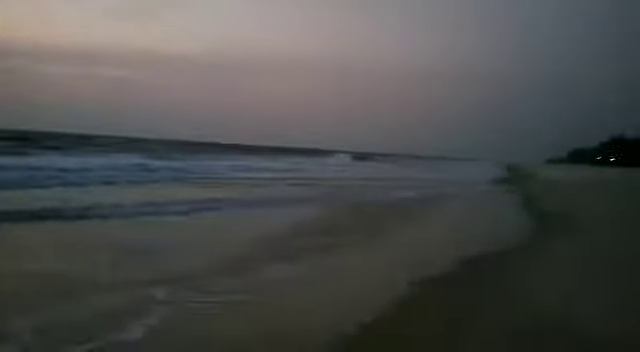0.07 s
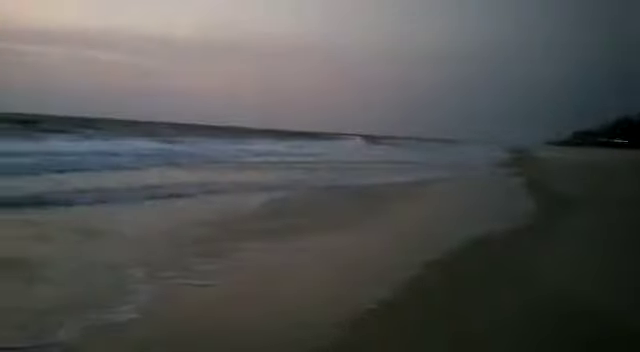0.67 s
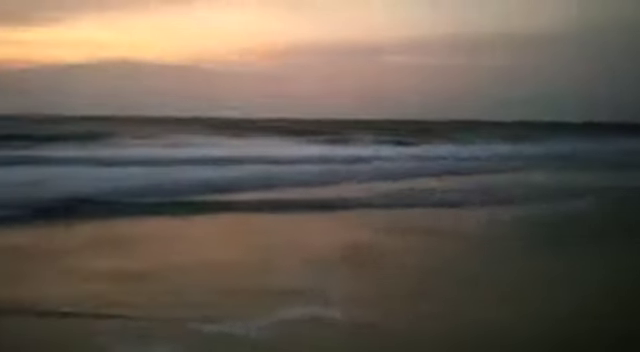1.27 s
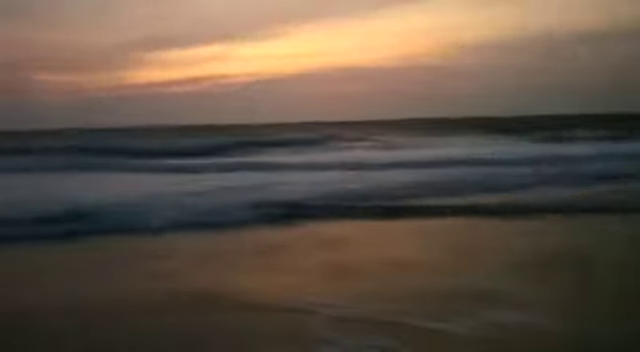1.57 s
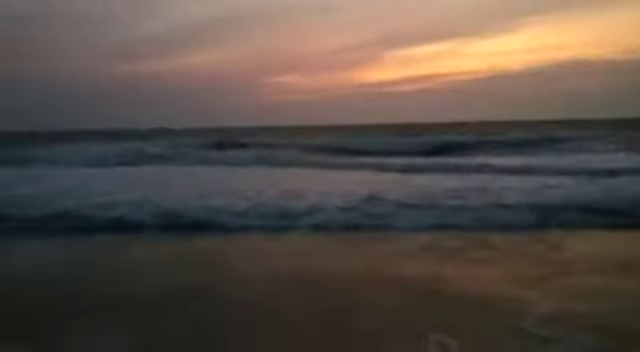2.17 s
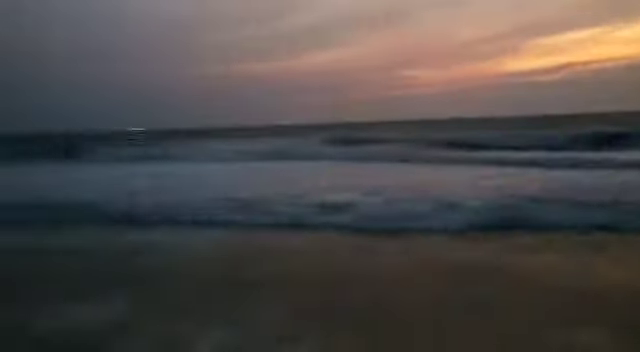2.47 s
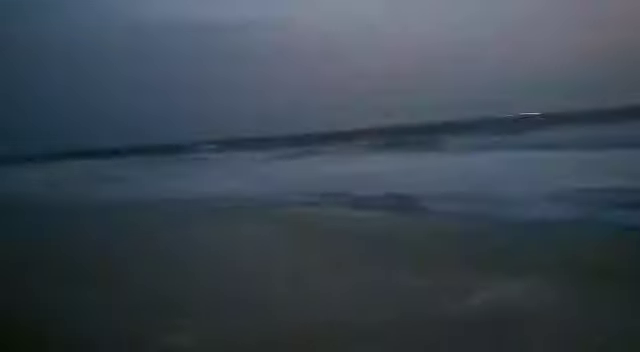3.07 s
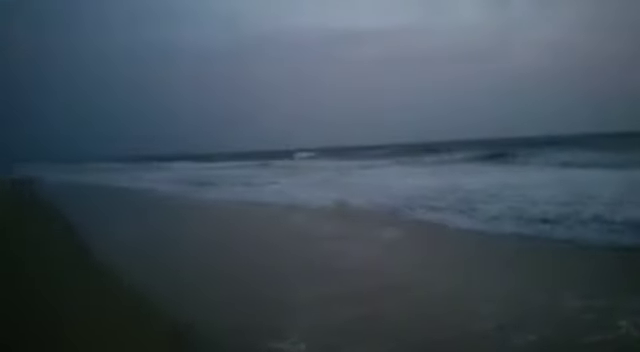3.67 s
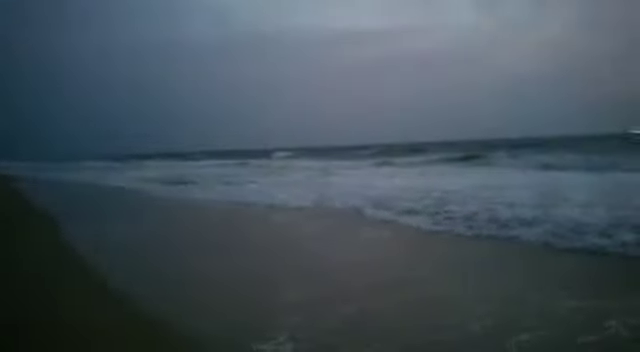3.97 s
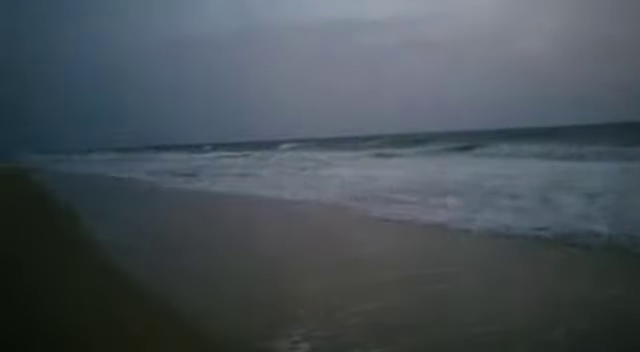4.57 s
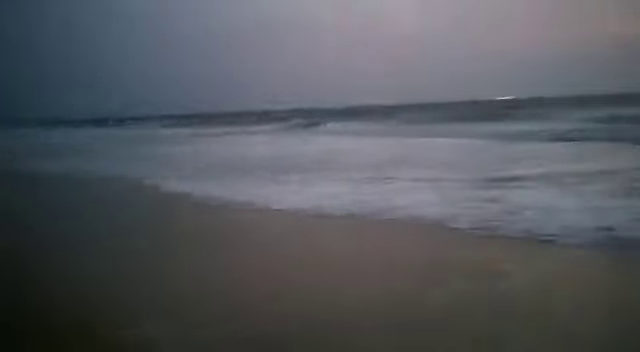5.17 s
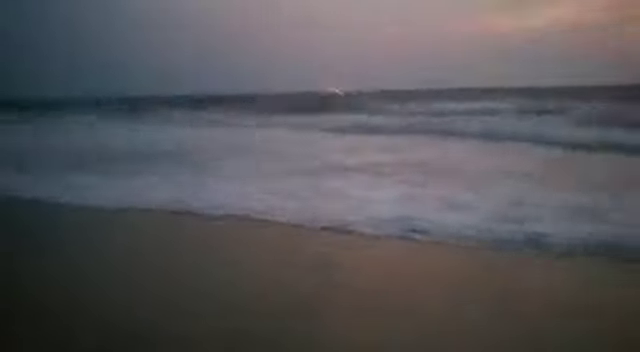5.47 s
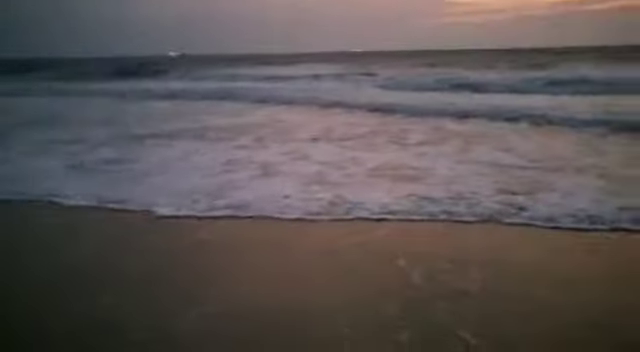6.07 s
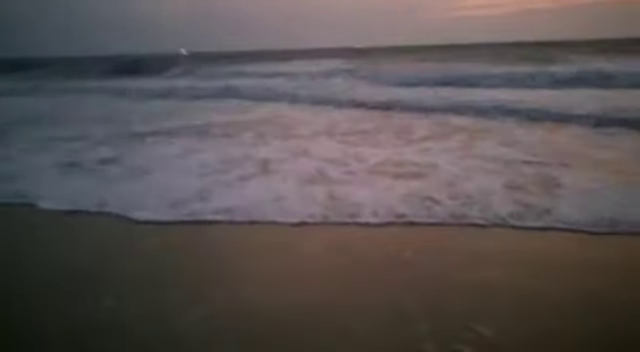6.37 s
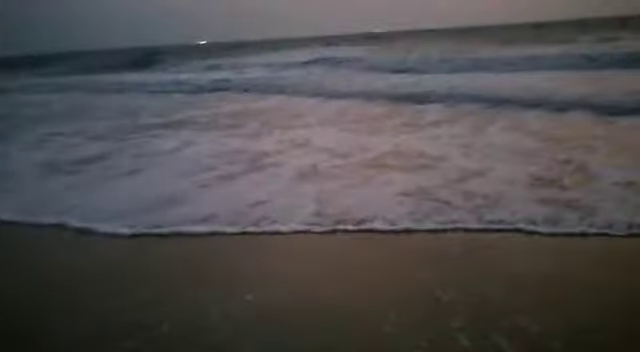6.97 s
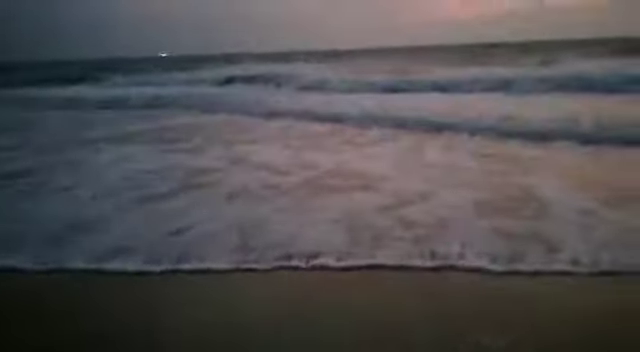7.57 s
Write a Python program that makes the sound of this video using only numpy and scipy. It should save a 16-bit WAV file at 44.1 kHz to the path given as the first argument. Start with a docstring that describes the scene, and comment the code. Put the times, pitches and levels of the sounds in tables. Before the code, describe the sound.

Foaming waves hiss on a beach while wind buffets the microphone with a rushing roar, low rumble and sputters.

```python
"""Sea wind blows across a hand-held camera while surf washes up a sandy beach behind it.
Swirling air at the two microphone openings makes a rushing roar and overloads them into a low rumble.
The roar is long and hissy on the exposed right side and comes in ragged puffs on the sheltered left.
Underneath, countless bursting foam bubbles merge into a steady, finely crackling hiss,
whose tone shifts as the camera turns from the shoreline to the sea."""
import sys
import numpy as np
from scipy import signal
from scipy.fft import rfft, irfft, next_fast_len
from scipy.io import wavfile
from scipy.ndimage import uniform_filter1d

SR = 44100
rng = np.random.default_rng(int(sys.argv[2]) if len(sys.argv) > 2 else 0)


def store_wav(level_fs):
    """Save 16-bit WAV to argv[1]."""
    pcm = np.round(np.clip(np.atleast_2d(level_fs), -1, 1) * 32767)
    wavfile.write(sys.argv[1], SR, pcm.T.astype(np.int16))


N = 344421
TIME = np.arange(N) / SR


# How hard the air blows on the right, before lulls: (time [s], strength [dB])
RIGHT_FLOW = [(0.0, -19), (0.45, -20), (0.85, -16.5), (1.22, -17), (1.29, -12), (1.6, -11.5), (1.69, -9.5),
              (1.78, -8.5), (2.15, -9.3), (2.8, -7), (3.42, -7.5), (3.62, -13), (3.8, -22.5), (4.2, -24.5),
              (4.48, -27.5), (4.72, -17), (4.9, -15.5), (4.95, -11.5), (5.09, -10), (5.16, -5.5),
              (5.45, -7), (5.58, -5.5), (5.8, -8), (6.1, -6), (7.26, -5.5), (7.31, -2), (7.58, -4),
              (7.81, -4.5)]
# Right rumble, before lulls; more tilt means more treble: (time [s], level [dB], tilt [dB/octave])
RIGHT_RUMBLE = [(0.0, -12.5, 5.5), (1.3, -13.5, 8), (1.85, -17.5, 0.5), (2.2, -21.5, 7), (2.7, -17.5, 6),
                (3.15, -16, 7), (3.5, -16.5, 1), (3.9, -17, 0.5), (4.7, -19.5, -1), (5.8, -17, 7),
                (6.8, -17.5, 1.5), (7.26, -15, 11), (7.38, -17, 9.5), (7.81, -16, 2)]
def right_wind():
    """Air blows over the exposed opening: it roars, hisses, rings and rumbles."""
    lull_db, flutter = lulls(), wander(17.4)
    flow_db = follow(RIGHT_FLOW) - lull_db
    rush = roar(flow_db, flutter) + rim_hiss(flow_db, flutter) + hollow_rings()
    return rush + rumble(follow(RIGHT_RUMBLE) - 0.22 * lull_db, follow(RIGHT_RUMBLE, column=2))


# Tone of rushing air: (frequency [Hz], relative level [dB])
RUSH_TONE = [(60, -38), (150, -5), (260, -2.5), (400, -4), (550, -0.5), (1000, -0.5), (1500, -4.5),
             (2200, -13), (3200, -26), (4500, -37), (8000, -66)]
def roar(flow_db, flutter):
    """Churning air flutters when it is weak; when strong, it brightens and its loudness levels off."""
    level_db = level_off(flow_db, ceiling_db=-8)
    weakness_db = np.clip(-8 - level_db, 0, 14)
    unsteady_db = (0.47 + 0.074 * weakness_db) * flutter + 0.18 * weakness_db * wander(86)
    tilt = 0.083 * (np.maximum(level_db, -16) + 12.5) + 0.34 * (np.maximum(flow_db, -15) + 10)
    air = swirls(RUSH_TONE, tilt, pivot_hz=860, octaves=1.8)
    return air * gain_of(level_db + unsteady_db - 0.93)


# Brief drops in the wind on the right: (deepest time [s], depth [dB], sinking time [s])
WIND_LULLS = [(0.345, 25, 0.13), (0.93, 7, 0.028), (1.195, 10.5, 0.039), (1.48, 7, 0.054),
              (1.55, 1.5, 0.045), (1.8, 3, 0.028), (2.27, 5, 0.034), (3.54, 4.5, 0.042), (3.79, 7, 0.076),
              (3.92, 1, 0.038), (4.44, -1, 0.03), (4.58, 5.5, 0.069), (4.85, 19, 0.08), (7.13, 4.5, 0.043)]
def lulls(return_s=0.027):
    """The air flow sinks, then quickly picks up again; gives the loss in dB."""
    return sum(depth * np.exp(-((TIME - at) / np.where(TIME < at, sinking, return_s)) ** 2)
               for at, depth, sinking in WIND_LULLS)


# Tone of the hiss at the opening's rim: (frequency [Hz], relative level [dB])
RIM_TONE = [(600, -28), (1500, 2.5), (2300, 5), (3200, -0.5), (4300, -4.5), (5500, -11), (6800, -26.5),
            (9000, -48), (15000, -45)]
# Moments when that hiss spurts or thins: (time [s], change [dB], half length [s])
HISS_FLICKERS = [(1.683, 4.5, 0.022), (3.154, 5.5, 0.035), (4.74, 10, 0.029), (5.183, 3, 0.04),
                 (5.503, 2.5, 0.03), (5.81, -9, 0.037), (5.98, 3, 0.15), (6.236, -5, 0.05),
                 (6.485, -17, 0.022), (6.55, 2.5, 0.025), (6.947, -3.5, 0.2), (7.293, -1, 0.018),
                 (7.315, 2, 0.014), (7.45, 0.5, 0.1), (7.71, -10, 0.037)]
def rim_hiss(flow_db, flutter):
    """Air hisses over the rim of the opening, louder and brighter as it blows harder."""
    flicker_db = sum(db * np.exp(-((TIME - at) / half) ** 2) for at, db, half in HISS_FLICKERS)
    tilt = 0.88 * (np.maximum(flow_db, -14) + 5.5)
    hiss = swirls(RIM_TONE, tilt, pivot_hz=2250, octaves=1.3)
    return hiss * gain_of(flow_db - 17 + 2 * flutter + flicker_db)


# Hollow-sounding swells: (peak time [s], half length [s], level [dB], pitch [Hz], pitch spread [Hz])
HOLLOW_SWELLS = [(0.053, 0.11, -22.5, 600, 360), (0.876, 0.2, -20.5, 559.3, 360),
                 (1.343, 0.088, -17, 470.6, 300), (2.763, 0.21, -16.5, 900.6, 500),
                 (3.98, 0.39, -24, 112, 36), (4.22, 0.21, -29, 1193, 360), (5.305, 0.14, -14.5, 729, 360),
                 (5.635, 0.063, -21, 1253, 360)]
def hollow_rings(drift=0.05):
    """Churning air briefly rings around one drifting pitch."""
    out = 0
    for at, half, db, hz, spread_hz in HOLLOW_SWELLS:
        cycles = np.cumsum(hz * (1 + drift * wander(11.9))) / SR
        lowpass = signal.butter(2, spread_hz / 2, fs=SR, output="sos")
        stir = signal.sosfilt(lowpass, rng.standard_normal(N) + 1j * rng.standard_normal(N))
        ring = unit_level((stir * np.exp(2j * np.pi * cycles)).real)  # slow noise moved up to the pitch
        out = out + ring * gain_of(db) * np.exp(-((TIME - at) / half) ** 4 / 2)
    return out


# Tone of the wind's low rumble: (frequency [Hz], relative level [dB])
RUMBLE_TONE = [(12, -29), (25, -6), (40, -8.5), (60, 3), (90, 2), (150, -2.5), (230, -8.5), (310, -14),
               (400, -24), (550, -24.5), (1000, -32), (2500, -87)]
def rumble(level_db, tilt, smooth_s=0.01, headroom=1.53):
    """Wind overloads the microphone into a low rumble of nearly even loudness; more tilt quickens it."""
    push = swirls(RUMBLE_TONE, tilt, pivot_hz=114, octaves=1.4)
    window = np.hanning(int(2 * smooth_s * SR) + 3)
    power = signal.oaconvolve(push ** 2, window / window.sum(), "same")
    evened = unit_level(push / np.sqrt(abs(power) + 1e-6))
    return gain_of(level_db) * unit_level(np.tanh(evened / headroom))


# Left rumble, before gusts and puffs change it: (time [s], level [dB], tilt [dB/octave])
LEFT_RUMBLE = [(0.0, -27, -5), (1.2, -25, 3), (1.65, -26, -1), (2.2, -18, 2.5), (2.95, -19.5, -2),
               (3.3, -23, 1), (3.7, -19.5, 2), (4.7, -16.5, 0), (5.4, -18.5, 2), (6.5, -19, -2),
               (7.81, -21.5, 0)]
def left_wind(ragged_db=5, flutter_db=2):
    """At the sheltered opening, gusts break into ragged sputters with hard puffs among them."""
    power = gusts() * gain_of(ragged_db * wander(49)) ** 2 + gain_of(-0.5) ** 2 * puffs()
    fluttering_db = 10 * np.log10(power) + flutter_db * wander(190) - 1.3
    level_db = level_off(fluttering_db, ceiling_db=3)
    sputter = gain_of(level_db) * swirls(RUSH_TONE, 0.21 * (level_db + 4), pivot_hz=895, octaves=1.9)
    # the rumble swells and quickens under each gust and puff
    surge_db = np.clip(10 * np.log10(uniform_filter1d(power, size=700)) + 31, -5, 17)
    rumble_db = follow(LEFT_RUMBLE) + 0.26 * surge_db + 0.5 * wander(3.5)
    rumble_tilt = follow(LEFT_RUMBLE, column=2) + 0.38 * surge_db
    return sputter + cracks() + rumble(rumble_db, rumble_tilt)


# Gusts that reach round to the left side: (start [s], hold time [s], strength [dB])
LEFT_GUSTS = [(0.942, 0.061, -33), (1.62, 0.43, -25), (1.912, 0.54, -22.5), (2.5, 0.14, -33),
              (3.45, 1, -41), (4.69, 0.13, -32), (4.988, 0.38, -40), (6.068, 0.92, -25),
              (7.373, 0.1, -26.5), (7.635, 0.18, -30.5)]
def gusts(rise_s=0.048, fall_s=0.045, calm_db=-39):
    """Each gust rises, holds and dies away; gives the power of the air flow."""
    power = gain_of(calm_db) ** 2
    for start, hold, db in LEFT_GUSTS:
        fade = np.maximum(start - TIME, 0) / rise_s + np.maximum(TIME - start - hold, 0) / fall_s
        power = power + (gain_of(db) * np.exp(-fade)) ** 2
    return power


# Hard puffs of wind that strike the left side: (time [s], strength [dB], length [s])
HARD_PUFFS = [(1.654, -20, .008), (1.96, -16, .01), (1.975, -13, .01), (1.989, -11, .004),
              (2.038, -9, .004), (2.057, -9, .005), (2.067, -13, .004), (2.212, -12, .004),
              (2.249, -10, .003), (2.257, -10, .004), (2.321, -12, .005), (2.388, -10, 0.0073),
              (2.399, -13, .004), (2.468, -18, 0.015), (2.514, -13, .005), (2.585, -10, 0.0094),
              (2.666, -13, .005), (2.832, -20, .01), (3.732, -8, 0.0042), (3.82, -23, 0.0045),
              (3.904, -20, .004), (3.914, -19.5, 0.0056), (3.97, -14, .005), (4.137, -20, .012),
              (4.187, -27, 0.0054), (4.23, -19, 0.0099), (4.475, -8.5, 0.0038), (4.494, -22, .008),
              (4.526, -21, 0.0065), (4.539, -7, 0.0033), (4.56, -12, 0.0022), (4.607, -12, 0.0046),
              (4.621, -14, 0.0058), (4.63, -6.5, 0.0028), (4.684, -9.5, .004), (4.711, -14, .008),
              (4.729, -16, .003), (4.737, -15, .005), (4.753, -15, .006), (4.763, -11, .005),
              (4.77, -15, .002), (4.799, -19, .005), (4.806, -8.5, 0.0036), (4.817, -10, .002),
              (4.83, -12, 0.0055), (4.839, -10, 0.0047), (4.855, -9, .005), (4.861, -17, .002),
              (5.036, -15, 0.0077), (5.147, -14, .005), (5.162, -19, .004), (5.639, -11, 0.011),
              (6.001, -8, .005), (6.124, -11, .005), (6.194, -13, 0.0054), (6.215, -13, .008),
              (6.24, -10, .004), (6.249, -8, 0.0055), (6.326, -13, .003), (6.381, -12, .004),
              (6.467, -13, .005), (6.521, -11, 0.0063), (6.59, -8, .002), (6.606, -5, .003),
              (6.658, -8, .003), (6.732, -6, .002), (6.757, -12, .004), (6.768, -9, .003),
              (7.499, -11, .005)]
def puffs():
    """Each hard puff brings a short sputter; gives its power."""
    return sum(gain_of(db) ** 2 * np.exp(-(2 * (TIME - at) / length) ** 2)
               for at, db, length in HARD_PUFFS)


def cracks(typical_hz=880, typical_width_s=0.00058, glide_per_s=310, variety=0.4):
    """Each hard puff of wind overloads the microphone with a short, sharp crack."""
    out, t = np.zeros(N), np.arange(-220, 221) / SR
    for at, db, _ in HARD_PUFFS:
        speed, phase = rng.uniform(-1, 1, 2)
        own_time = t * np.exp(variety * speed)  # no two cracks are the same length
        cycles = typical_hz * np.expm1(glide_per_s * own_time) / glide_per_s
        crack = np.exp(-(own_time / typical_width_s) ** 2 / 2) * np.cos(2 * np.pi * cycles + np.pi * phase)
        start = round(at * SR) - len(t) // 2
        out[start:start + len(t)] += gain_of(db - 6) * crack
    return out


# Loudness of the surf, before its tone shifts: (time [s], left level [dB], right level [dB])
SURF_LEVELS = [(0.0, -31.5, -26.5), (0.75, -31, -27.5), (1.2, -29.5, -29), (2.0, -27.5, -26.5),
               (2.4, -27.5, -24), (2.65, -27.5, -26), (3.4, -28.5, -26.5), (3.57, -26.5, -25),
               (3.9, -27.5, -26.5), (4.5, -30.5, -29), (5.1, -31, -27), (5.25, -33.5, -31),
               (6.0, -34, -29.5), (6.7, -34, -31.5), (7.0, -35.5, -31), (7.81, -35.5, -30)]
# The wave tumbles in, then thins to a fizz: (time [s], left tilt [dB/octave], right tilt [dB/octave])
SURF_BRIGHTNESS = [(0.0, -0.5, -0.5), (1.6, -0.4, 0), (2.6, -0.2, -1), (4.6, 0.4, 1.5), (5.6, 0.7, 1),
                   (7.81, 0.1, -1)]
# Tone of the surf on each side: (frequency [Hz], facing the sea [dB], facing along the shore [dB])
LEFT_SURF_TONE = [(60, -7, -7), (250, -12, -15), (1000, -1, -3), (2200, -0.5, 3), (3170, -1, -2),
                  (4300, -4.5, -3), (5400, -6.8, -8.5), (6800, -11, -13), (7900, -15, -15.5),
                  (10950, -7.5, -7), (15000, -11, -10)]
RIGHT_SURF_TONE = [(60, -17, -20), (250, 5.5, 2), (1000, -3, -11), (2190, 1.5, 2), (3300, -2, -1),
                   (5200, 1.9, 0), (6030, -2.5, -5.5), (6860, -13.5, -16), (8100, -16, -18),
                   (11000, -13.5, -14.5), (15000, -13, -5.5)]
def surf(shared=0.024, patchy_db=1.63, mid_turn_s=2.3, half_turn_s=1):
    """Each side hears mostly its own stretch of foaming water; the tone shifts as the camera turns."""
    common = foam()
    seaward = (1 + np.tanh((TIME - mid_turn_s) / half_turn_s)) / 2
    sides = []
    for column, tone in enumerate([LEFT_SURF_TONE, RIGHT_SURF_TONE], start=1):
        hiss = np.sqrt(shared) * common + np.sqrt(1 - shared) * foam()
        facing_sea = with_tone(hiss, [(hz, sea) for hz, sea, _ in tone])
        along_shore = with_tone(hiss, [(hz, shore) for hz, _, shore in tone])
        water = seaward * facing_sea + (1 - seaward) * along_shore
        tilt = follow(SURF_BRIGHTNESS, column)
        tumbling = sum(band * gain_of(patchy_db * wander(19) + tilt * np.clip(np.log2(hz / 4000), -2, 2))
                       for hz, band in octave_bands(water))
        sides.append(tumbling * gain_of(follow(SURF_LEVELS, column)))
    return np.array(sides)


def foam(ticks_per_s=2500, spread_db=1.5, ticks_db=-7):
    """Countless bubbles merge into a hiss; the nearer ones burst as tiny separate ticks."""
    sizes = gain_of(spread_db * np.minimum(rng.exponential(1, N), 4))
    ticks = sizes * rng.choice([-1, 1], N) * (rng.random(N) < ticks_per_s / SR)
    return unit_level(rng.standard_normal(N) + gain_of(ticks_db) * unit_level(ticks))


def swirls(tone, tilt, pivot_hz, octaves):
    """Noise of churning air: faster air makes smaller swirls, tipping the tone towards the treble."""
    bands = octave_bands(with_tone(rng.standard_normal(N), tone))
    return sum(band * gain_of(tilt * np.clip(np.log2(hz / pivot_hz), -octaves, octaves))
               for hz, band in bands)


def gain_of(db):
    """Turns decibels into a volume multiplier."""
    return 10 ** (np.asarray(db) / 20)


def level_off(db, ceiling_db):
    """Lets a level approach a ceiling without passing it."""
    return -10 * np.log10(1 / gain_of(db) ** 2 + 1 / gain_of(ceiling_db) ** 2)


def unit_level(x):
    """Scales a signal to an average power of 1."""
    return x / np.sqrt(np.mean(x ** 2) + 1e-20)


def follow(rows, column=1):
    """Joins a table's points in time with straight lines."""
    rows = np.asarray(rows)
    return np.interp(TIME, rows[:, 0], rows[:, column])


def with_tone(x, tone):
    """Shapes the bass and treble of x from a tone table, at an average power of 1."""
    hz, db = np.transpose(tone)
    size = next_fast_len(N)
    freqs = np.fft.rfftfreq(size, 1 / SR)
    gains = gain_of(np.interp(np.log(freqs + 1), np.log(hz), db))
    return unit_level(irfft(rfft(x, size) * gains, size)[:N])


def wander(rate_hz, step=64):
    """A smooth random wobble, up to about rate_hz fast."""
    count = N // step + 2
    freqs = np.fft.rfftfreq(count, step / SR)
    gains = freqs / (freqs + rate_hz / 10) / (1 + (freqs / rate_hz) ** 2)
    slow = irfft(rfft(rng.standard_normal(count)) * gains, count)
    return unit_level(np.interp(np.arange(N), np.arange(count) * step, slow))


def octave_bands(x):
    """Splits x into overlapping octaves that add back up to x: (centre [Hz], band)."""
    size = next_fast_len(N)
    octave = np.log2(np.clip(np.fft.rfftfreq(size, 1 / SR), 32, 16384))
    spectrum = rfft(x, size)
    return [(2 ** k, irfft(spectrum * np.maximum(1 - abs(octave - k), 0), size)[:N])
            for k in range(5, 15)]


def scene():
    """Each side's own wind, over the surf."""
    return np.array([left_wind(), right_wind()]) + surf()


def record(dry, cutoff_hz=15800):
    """Rounds off the loudest peaks, then removes the highest treble."""
    rounded = dry / (1 + dry ** 6) ** (1 / 6)
    lowpass = signal.firwin(511, cutoff_hz, window=("kaiser", 9), fs=SR)
    return signal.oaconvolve(rounded, lowpass[None], "same")


dry = scene()
out = record(dry)
store_wav(out)
```